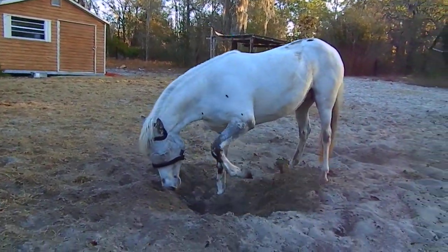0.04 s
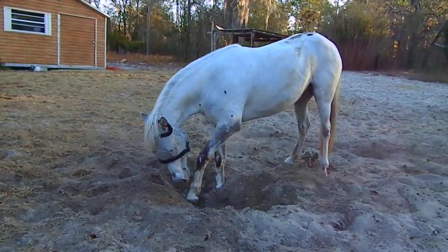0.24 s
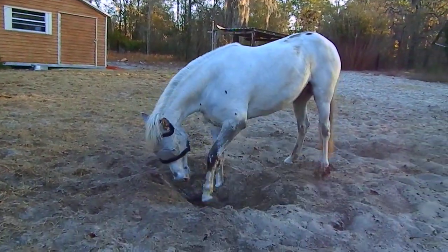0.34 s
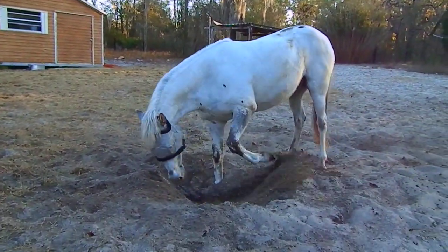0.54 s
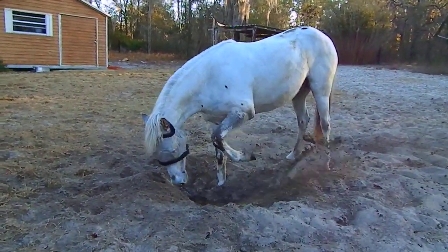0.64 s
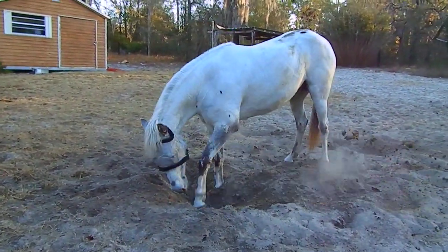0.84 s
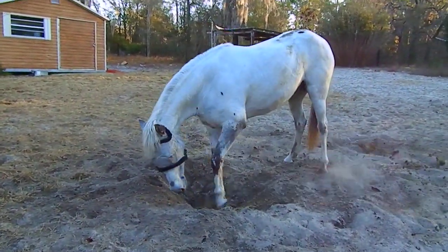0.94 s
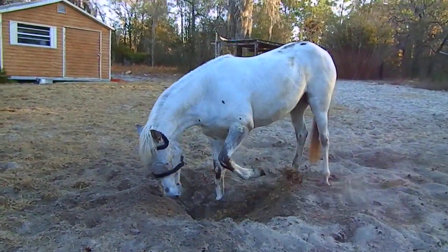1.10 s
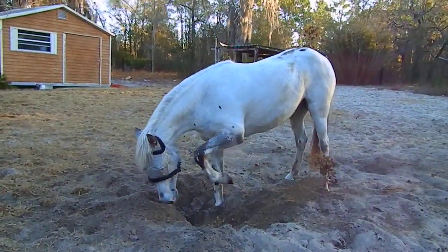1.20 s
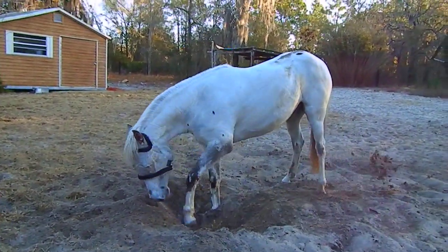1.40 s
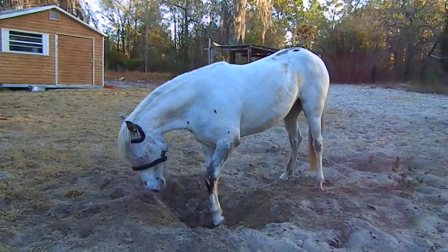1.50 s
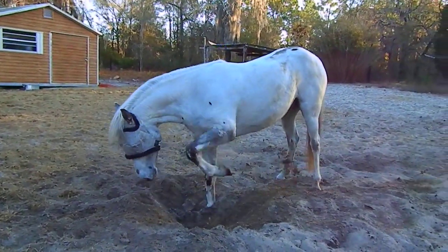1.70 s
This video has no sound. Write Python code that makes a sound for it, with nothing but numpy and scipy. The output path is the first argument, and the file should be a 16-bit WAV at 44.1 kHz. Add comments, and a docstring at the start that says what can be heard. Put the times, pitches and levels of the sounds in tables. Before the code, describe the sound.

A horse's hoof paws sandy ground, scraping and thudding as flung sand sprays and patters.

```python
"""A pony paws a hollow in a sandy yard, heard in mono over a low hum and faint outdoor noise.
First flung sand hisses, a distant bird whistles and the hoof scrapes the soil. One sharp knock follows,
a brief contact exciting damped modes, and clods patter after it. The bird calls again; a soft thud
brings a long spray of sand, more scraping and a slide of loose earth. Last the hoof digs and lands
in dull thuds with gritty rasps, and the sand settles."""
import sys
import numpy as np
from scipy import signal
from scipy.fft import rfft, irfft
from scipy.io import wavfile
from scipy.ndimage import uniform_filter1d

SR = 44100
rng = np.random.default_rng(int(sys.argv[2]) if len(sys.argv) > 2 else 0)


def wrap_up_sound(samples):
    """Save the sound to the file named by the first command line argument, as 16-bit audio."""
    columns = np.atleast_2d(samples).T
    # keep every value between -1 and 1, then stretch to whole-number steps
    tamed = np.clip(columns, -1, 1)
    steps = np.round(tamed * 32767).astype(np.int16)
    wavfile.write(sys.argv[1], SR, steps)


N = 77175

# partials of the hum (frequency [Hz], level [dB])
HUM_PARTIALS = [(58.5, -53), (119.6, -49)]
# spectrum of the outdoor noise (frequency [Hz], relative level [dB])
AIR_SPECTRUM = [(25, -2), (55, -5.5), (85, 4), (130, 3), (200, -4), (300, -8), (480, -5.5), (750, -5.5),
                (1050, -11), (1450, -10), (2100, -18.5), (3500, -23.5), (6000, -24), (9000, -19),
                (12000, -25.5), (16000, -26)]
# sprays of sand (peak time [s], level [dB], rise [s], hold [s], fall [s])
SAND_SPRAYS = [(0.032, -50.5, 0.021, 0.016, 0.075), (0.153, -47.5, 0.0062, 0.0059, 0.012),
               (0.279, -51, 0.067, 0.0043, 0.017), (0.38, -53.5, 0.037, 0.13, 0.038),
               (0.837, -49, .01, .02, 0.037), (0.891, -46.5, 0.0081, 0.26, 0.84),
               (1.047, -55.5, 0.12, .1, .15), (1.52, -50.5, 0.036, .015, 0.085),
               (1.73, -55, 0.032, 0.0056, 0.15)]
# spectrum of landing sand (frequency [Hz], relative level [dB])
SAND_SPECTRUM = [(1000, 3), (3000, -6), (4800, -3.5), (6500, -2.5), (8500, 2), (10000, 0), (12500, -5),
                 (16000, -10.5)]
# bursts of grit (peak time [s], level [dB])
GRIT_BURSTS = [(.024, -51), (.046, -43.5), (0.151, -48), (.275, -43.5), (0.51, -44.5), (0.896, -41),
               (0.941, -44.5), (1.026, -45), (1.073, -45)]
# spectrum of grit (frequency [Hz], relative level [dB])
GRIT_SPECTRUM = [(1500, 0), (4000, -7), (8500, 3), (13000, -6), (16000, -9)]
# bird calls (start time [s], level [dB], gain of the closing lift [dB])
BIRD_CALLS = [(.08, -49, -3), (0.673, -48, -8.5)]
# contour of one call (time from its start [s], pitch [Hz], relative level [dB])
CALL_CONTOUR = [(0, 1250, -5), (0.036, 1405, 1), (0.076, 1384, 1), (.115, 1360, 0.5), (.155, 1570, 3.5),
                (0.199, 1480, 2), (0.234, 1320, -20)]
# strokes through the soil (peak time [s], level [dB], rise [s], fall [s])
SCRAPE_STROKES = [(.09, -52, 0.011, .012), (0.197, -53, 0.026, 0.023), (.93, -58, 0.091, 0.061),
                  (1.055, -47, 0.089, 0.049), (1.43, -52, 0.043, 0.078), (1.52, -46, 0.022, 0.014),
                  (1.716, -50, 0.0044, 0.012)]
# spectrum of scraped soil (frequency [Hz], relative level [dB])
SCRAPE_SPECTRUM = [(150, -14), (500, -2), (1200, 2.5), (2200, -0.5), (3500, -7), (6000, -18.5),
                   (15000, -42)]
# hoof blows (time [s], gain [dB], contact time [ms], mode frequency ratio [1])
HOOF_BLOWS = [(.238, -6, 0.47, 1.022), (0.242, -14.5, 2.55, 1.5), (0.2644, -20.5, 3.7, 0.96),
              (0.8308, -16, 4.7, 0.91), (1.3594, -8.5, 4.5, 1.25), (1.387, -26, 3.6, 0.83),
              (1.479, -18, 2.5, 0.98), (1.4943, -12, 4.3, 1.01)]
# modes of hoof on packed earth (frequency [Hz], relative level [dB], 60 dB decay time [s])
IMPACT_MODES = [(178, -5.5, 0.03), (473, -2.5, 0.019), (600, -6.5, 0.021), (755, -10.5, 0.025),
                (1000, -15.5, 0.024), (1340, -7.5, 0.0054), (1620, -11, 0.0084), (2480, -16, 0.012)]
# showers of small clods (peak time [s], level [dB], rise [s], fall [s])
CLOD_SHOWERS = [(0.278, -42, 0.039, 0.06), (.46, -47, .04, 0.043), (1.071, -44, 0.21, 0.2),
                (1.49, -47.5, 0.22, 0.084)]
# spectrum of landing clods (frequency [Hz], relative level [dB])
CLOD_SPECTRUM = [(45, -5.5), (110, -21), (190, 4.5), (300, -7.5), (440, -2.5), (800, -17), (1600, -19),
                 (5000, -49.5)]
# slides of loose earth (peak time [s], level [dB], rise [s], fall [s])
EARTH_SLIDES = [(1.06, -46.5, 0.04, .06), (1.17, -49, 0.11, 0.23), (1.52, -58, 0.077, 0.12)]
# spectrum of sliding earth (frequency [Hz], relative level [dB])
SLIDE_SPECTRUM = [(120, -49), (290, -14), (380, 0), (440, 3.5), (520, -12), (750, -13.5), (1100, -14.5),
                  (4000, -54)]
# thin gritty rasps (peak time [s], level [dB], rise [s], fall [s], frequency ratio [1])
RASP_STROKES = [(1.389, -48.5, .004, 0.029, 0.97), (1.444, -45.5, 0.016, 0.025, 1.0),
                (1.469, -41, .002, 0.0021, 0.9), (1.535, -52, 0.038, 0.072, 0.79)]
# spectrum of a rasp at ratio 1 (frequency [Hz], relative level [dB])
RASP_SPECTRUM = [(2000, -26), (4000, -16), (4650, -6), (5900, -4), (6500, -9), (12000, -40)]


def undb(db):
    """Amplitude ratio of a level in decibels."""
    return 10 ** (np.asarray(db) / 20)


def unit(x):
    """Normalisation to an rms of 1."""
    return x / np.sqrt(np.mean(x ** 2) + 1e-18)


def colour(x, spectrum):
    """Spectral shaping by (frequency [Hz], level [dB]) points, to an rms of 1."""
    hz, db = np.array(spectrum, float).T
    bin_hz = np.maximum(np.arange(N // 2 + 1) * SR / N, 1)
    gain = undb(np.interp(np.log(bin_hz), np.log(hz), db))
    return unit(irfft(rfft(x) * gain, N))


def drift(rate_hz):
    """Smoothed random steps: a modulation with a spread near 1."""
    width = max(int(SR / rate_hz), 1)
    steps = rng.standard_normal(2048)[np.arange(N) // width % 2048]
    return 1.3 * uniform_filter1d(uniform_filter1d(steps, width), width)


def grains(spectrum, per_s=5600, spread_db=4):
    """Shot noise: tiny random impacts, a few much stronger than the rest, share one spectrum."""
    size = undb(spread_db * np.minimum(rng.exponential(size=N), 5))
    strikes = rng.random(N) < per_s / SR
    polarity = np.sign(rng.standard_normal(N))
    return colour(strikes * size * polarity, spectrum)


def swell(t, at, db, rise, fall, hold=0):
    """Envelope with a Gaussian rise, a hold and an exponential decay."""
    return undb(db) * np.exp(-(np.minimum(t - at, 0) / rise) ** 2 - np.maximum(t - at - hold, 0) / fall)


def swells(t, rows):
    """Incoherent addition: overlapping bursts sum in power."""
    return np.sqrt(sum(swell(t, *row) ** 2 for row in rows))


def background(t):
    """Random amplitude and frequency modulation make a low hum waver over broadband outdoor noise."""
    hum = np.zeros(N)
    for hz, db in HUM_PARTIALS:
        gain = undb(db + 1.3 * drift(10.3))
        phase = 2 * np.pi * hz * np.cumsum(1 + 0.0181 * drift(8.15)) / SR
        hum += gain * unit(np.sin(phase))
    air = colour(rng.standard_normal(N), AIR_SPECTRUM)
    return hum + air * undb(-45 + 0.25 * drift(9.1))


def sand(t, crossover_hz=7400, settle_s=0.46):
    """Dense impacts merge into hiss; coarse grains land first, so the lower band decays sooner."""
    fine_power, coarse_power = np.zeros((2, N))
    for at, db, rise, hold, fall in SAND_SPRAYS:
        flow = swell(t, at, db, rise, fall, hold)
        age = np.maximum(t - at - hold, 0)
        fine_power += flow ** 2
        coarse_power += (flow * np.exp(-age / settle_s)) ** 2
    hiss = grains(SAND_SPECTRUM, per_s=20000, spread_db=2.5)
    coarse = signal.sosfiltfilt(signal.butter(2, crossover_hz, fs=SR, output="sos"), hiss)
    fine = hiss - coarse
    flicker = undb(1.46 * drift(90.64))
    return (coarse * np.sqrt(coarse_power) + fine * np.sqrt(fine_power)) * flicker


def grit(t, rise_s=0.002, fall_s=0.005):
    """Pinches of coarse sand strike almost at once, giving broadband transients."""
    return grains(GRIT_SPECTRUM) * swells(t, [(at, db, rise_s, fall_s) for at, db in GRIT_BURSTS])


def bird(t, jitter=0.028, flutter_db=3):
    """A whistle holds its note, lifts and drops; rapid random modulation makes it slightly hoarse."""
    age, pitch_hz, level_db = np.array(CALL_CONTOUR).T
    in_lift = age > 0.4 * age[-1]
    out = np.zeros(N)
    for at, db, lift_db in BIRD_CALLS:
        hz = np.interp(t - at, age, pitch_hz) * (1 + jitter * drift(300))
        phase = 2 * np.pi * np.cumsum(hz) / SR
        tone = unit(np.sin(phase) * undb(flutter_db * drift(118.1)))
        envelope = np.interp(t - at, age, undb(level_db + lift_db * in_lift), left=0, right=0)
        out += undb(db) * tone * envelope
    return out


def tree_echo(x, echo_db=-8, decay_s=0.3):
    """Diffuse reflection from the edge of the wood adds an exponentially decaying tail."""
    age = np.arange(SR) / SR
    tail = rng.standard_normal(len(age)) * np.exp(-age / decay_s)
    return x + undb(echo_db) * signal.fftconvolve(x, tail / np.linalg.norm(tail))[:N]


def scrapes(t):
    """Friction noise: the dragging hoof sets off many small collisions in gritty soil."""
    return grains(SCRAPE_SPECTRUM) * swells(t, SCRAPE_STROKES)


def hoof(t, crack_hz=6160, crack_decay_s=0.00096, low_cut_hz=100.6):
    """Impacts excite damped modes; a longer contact is duller, and only a brief one cracks."""
    age = t[:SR // 10]
    crack_band = signal.butter(2, [0.6 * crack_hz, 1.2 * crack_hz], "band", fs=SR, output="sos")
    out = np.zeros(N)
    for at, db, contact_ms, ratio in HOOF_BLOWS:
        ring = sum(undb(mode_db) * np.sin(2 * np.pi * hz * ratio * age) * undb(-60 * age / t60)
                   for hz, mode_db, t60 in IMPACT_MODES)
        force = np.sin(np.pi * np.minimum(age * 1e3 / contact_ms, 1)) ** 2
        thud = signal.fftconvolve(ring, force / force.sum())[:len(age)]
        noise = signal.sosfilt(crack_band, rng.standard_normal(len(age)))
        hardness = np.exp(-2 * contact_ms ** 2)
        crack = 0.2667 * hardness * noise * np.exp(-age / crack_decay_s)
        out += undb(db) * np.interp(t - at, age, thud + crack, left=0, right=0)
    return signal.sosfilt(signal.butter(3, low_cut_hz, "high", fs=SR, output="sos"), out)


def clods(t):
    """Falling clods patter as sparser shot noise with its energy at low frequencies."""
    return grains(CLOD_SPECTRUM, per_s=1200, spread_db=1) * swells(t, CLOD_SHOWERS)


def slides(t):
    """Granular flow: loose earth runs down the side of the hollow with a low band of noise."""
    return grains(SLIDE_SPECTRUM) * swells(t, EARTH_SLIDES)


def rasps(t):
    """Brief friction on grit gives a narrow treble band, transposed for each stroke."""
    out = np.zeros(N)
    for at, db, rise, fall, ratio in RASP_STROKES:
        spectrum = [(hz * ratio, band_db) for hz, band_db in RASP_SPECTRUM]
        out += grains(spectrum) * swell(t, at, db, rise, fall)
    return out


def scene():
    """Superposition: all sources add into one signal, the same in both channels."""
    t = np.arange(N) / SR
    mono = background(t) + sand(t) + grit(t) + tree_echo(bird(t))
    mono += scrapes(t) + hoof(t) + clods(t) + slides(t) + rasps(t)
    return np.array([mono, mono])


def record(dry, cutoff_hz=15950):
    """Band limiting: a steep elliptic low-pass filter removes the highest treble."""
    return signal.sosfilt(signal.ellip(12, 0.1, 80, cutoff_hz, fs=SR, output="sos"), dry)


dry = scene()
out = record(dry)
wrap_up_sound(out)
```